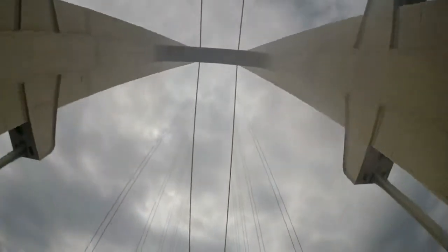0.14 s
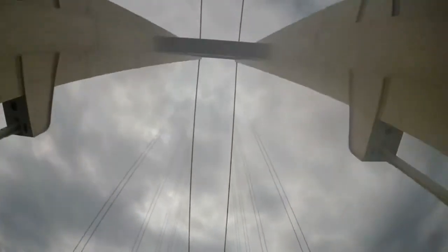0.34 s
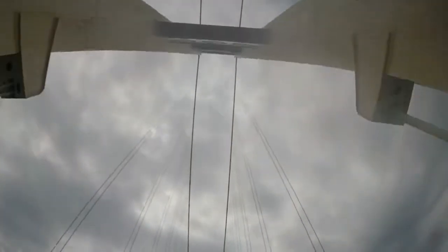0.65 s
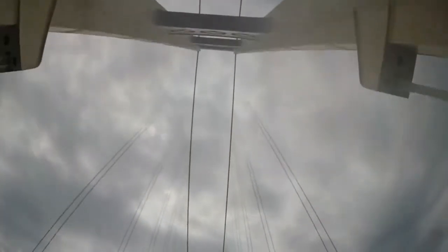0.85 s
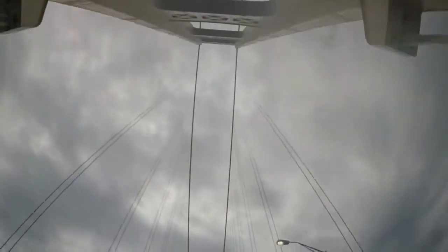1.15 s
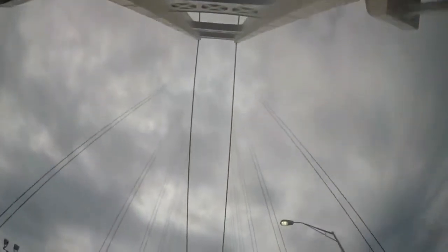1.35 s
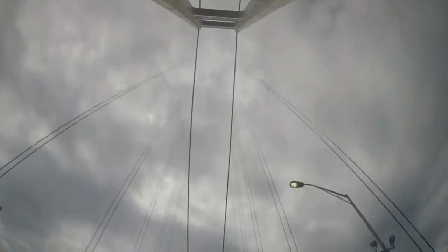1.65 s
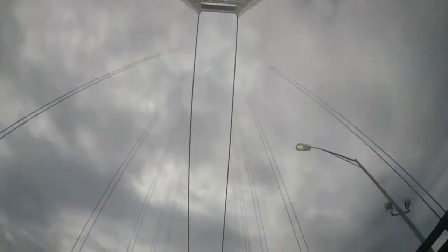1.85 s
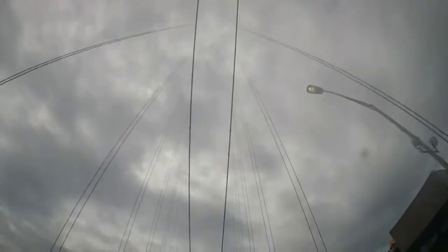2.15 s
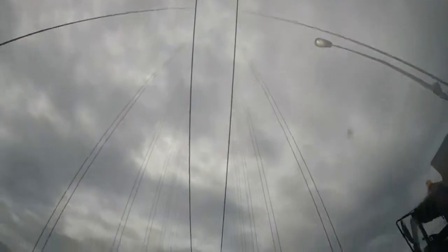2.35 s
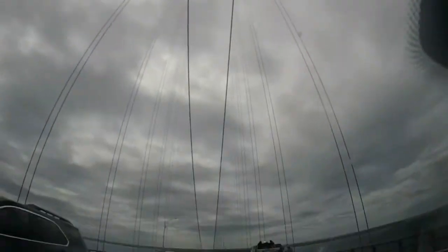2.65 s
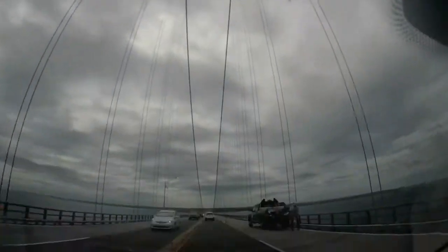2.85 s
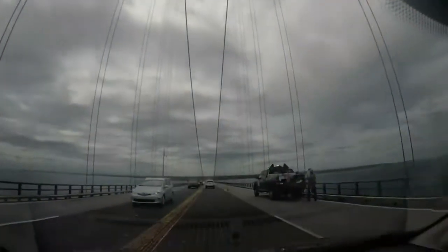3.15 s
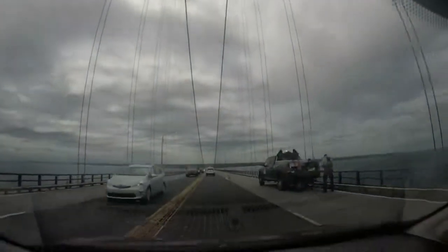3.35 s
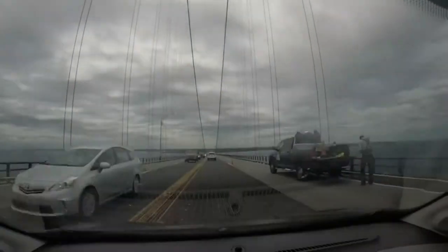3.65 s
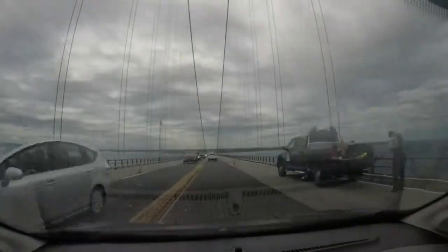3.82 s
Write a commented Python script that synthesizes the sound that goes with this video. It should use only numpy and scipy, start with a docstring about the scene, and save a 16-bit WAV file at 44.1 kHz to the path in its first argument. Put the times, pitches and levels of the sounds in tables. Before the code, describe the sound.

Tyres humming on a steel bridge deck, heard inside a rumbling car, with a few clicks.

```python
"""Tyres hum on the steel grating of a suspension bridge, heard from inside a car gathering speed.
The bars beat on the tread, so the hum climbs in pitch, and the deck drones along more weakly.
All the while the body rumbles, the road roars through the floor and wind hisses at the windows.
A camera is tilted down by hand: its plastic case clicks and its mount rubs."""
import sys
import numpy as np
from scipy import signal
from scipy.fft import rfft, irfft
from scipy.io import wavfile
from scipy.ndimage import uniform_filter1d

SR = 44100
rng = np.random.default_rng(int(sys.argv[2]) if len(sys.argv) > 2 else 0)


def to_wav(sig):
    """Store sig (one row per channel, or 1-D mono) as 16-bit WAV at the path in sys.argv[1].

    Samples outside -1..1 are clipped; the rate is SR.
    """
    pcm = np.clip(np.atleast_2d(sig), -1, 1) * 32767
    pcm = np.round(pcm).astype(np.int16)
    wavfile.write(sys.argv[1], SR, pcm.T)  # frames by channels


N = 175518
TIME = np.arange(N) / SR


def gain_of(db):
    """Turns decibels (dB) into a number to multiply by."""
    return 10 ** (np.asarray(db) / 20)


def evened(x):
    """Scales a signal to an average power of 1."""
    return x / np.sqrt(np.mean(abs(x) ** 2) + 1e-20)


def curve(rows, column=1):
    """Joins a table's points in time with straight lines."""
    rows = np.array(rows)
    return np.interp(TIME, rows[:, 0], rows[:, column])


def add(mix, start_s, sound):
    """Mixes a sound in at its start time."""
    part = mix[max(round(start_s * SR), 0):][:len(sound)]
    part += sound[:len(part)]


def noise(spectrum):
    """Noise with the given balance of low and high frequencies."""
    hz, db = np.transpose(spectrum)
    shape = gain_of(np.interp(np.log(np.fft.rfftfreq(N, 1 / SR) + 1), np.log(hz), db))
    return evened(irfft(rfft(rng.standard_normal(N)) * shape, N))


def wander(rate_hz):
    """A random drift, mostly slower than the given rate."""
    smoothing = 1 + (np.fft.rfftfreq(N, 1 / SR) / rate_hz) ** 2
    return evened(irfft(rfft(rng.standard_normal(N)) / smoothing, N))


def steadied(x, span_s):
    """Takes the slow swells out of a noise."""
    return x / np.sqrt(abs(uniform_filter1d(x ** 2, int(span_s * SR))) + 1e-9)


def patchy(x, depth_db, band_hz=400, swell_s=.06):
    """Lets narrow bands of a noise swell and sink on their own."""
    bands = signal.stft(x, nperseg=1024, noverlap=768)[2]
    bin_hz, frame_s = SR / 1024, 256 / SR
    swells = uniform_filter1d(rng.standard_normal(bands.shape), int(band_hz / bin_hz), axis=0)
    swells = evened(uniform_filter1d(swells, int(swell_s / frame_s), axis=1))
    return evened(signal.istft(bands * gain_of(depth_db * swells), nperseg=1024, noverlap=768)[1][:N])


def tone(hz, unsteady, rate_hz):
    """A tone that follows a pitch curve; unsteady runs from 0 (pure) to 1 (all waver)."""
    waver = unsteady * (wander(rate_hz) + 1j * wander(rate_hz)) / np.sqrt(2)
    wave = np.exp(2j * np.pi * (np.cumsum(hz) / SR + rng.random()))
    return np.sqrt(2) * ((np.sqrt(1 - unsteady ** 2) + waver) * wave).real


def gate(start, end, rise_s=.07, fall_s=.07):
    """Fades in, holds and fades out."""
    return np.clip((TIME - start) / rise_s, 0, 1) * np.clip((end - TIME) / fall_s, 0, 1)


def ring(hz, db, ring_s):
    """One vibration that fades by 60 dB in ring_s seconds."""
    t = np.arange(SR // 10) / SR
    return gain_of(db - 60 * t / ring_s) * np.sin(2 * np.pi * hz * t)


def cabin(x, echo_db, ring_s=.04):
    """Adds dense, quickly dying echoes off the glass and trim."""
    t = np.arange(SR // 10) / SR
    tail = rng.standard_normal(len(t)) * gain_of(-60 * t / ring_s)
    return x + gain_of(echo_db) * signal.fftconvolve(x, tail / np.linalg.norm(tail))[:N]


# How loud the body rumbles. Each row: time in seconds, level in dB.
RUMBLE_LEVELS = [(0, -10.5), (.23, -11), (.29, -22.5), (.45, -17.5), (.56, -21.5), (.66, -12.5), (.78, -18),
                 (.93, -15.5), (1.05, -22.5), (1.32, -25), (1.6, -20), (1.85, -14.5), (2.1, -20.5),
                 (2.5, -26.5), (2.69, -12.5), (2.82, -23), (3.2, -12), (3.45, -18), (3.56, -11.5),
                 (3.7, -21.5), (3.98, -15.5)]
# The rumble's tone colour. Each row: frequency in Hz, relative level in dB.
RUMBLE_COLOUR = [(5, -19), (22, -2.5), (32, -6.5), (42, -10), (55, -17.5), (75, -21.5), (95, -35),
                 (150, -33), (230, -60), (600, -130)]


def body_rumble():
    """Bumps shake the car's body into a deep rumble."""
    return gain_of(curve(RUMBLE_LEVELS)) * steadied(noise(RUMBLE_COLOUR), span_s=.077)


# How loud the road roars. Each row: time in seconds, low roar in dB, upper roar in dB.
ROAR_LEVELS = [(0, -35, -39), (.25, -31, -39.5), (.36, -37.5, -48), (.55, -34, -44.5), (.8, -39.5, -40.5),
               (1.05, -34.5, -45.5), (1.4, -30, -37.5), (1.7, -24, -38.5), (2.1, -26, -32),
               (2.4, -22.5, -32.5), (2.8, -25.5, -34.5), (3.05, -23, -33), (3.35, -28.5, -35),
               (3.65, -36.5, -35.5), (3.98, -28.5, -34.5)]
# The tone colours of the two roars. Each row: frequency in Hz, relative level in dB.
LOW_ROAR_COLOUR = [(40, -14), (72, 2.5), (130, -5.5), (175, -4.5), (220, -16), (330, -15.5), (450, -22),
                   (3000, -100)]
UPPER_ROAR_COLOUR = [(150, -9.5), (330, 1), (430, 1.5), (520, 0.5), (640, 2.5), (800, -6.5), (1000, -6.5),
                     (1300, -6.5), (1550, -11.5), (1800, -16), (2200, -27.5), (3000, -29), (14000, -86)]


def road_roar():
    """The rolling tyres roar through the floor; the upper part flutters slightly."""
    low = gain_of(curve(ROAR_LEVELS)) * steadied(noise(LOW_ROAR_COLOUR), span_s=.4)
    upper_db = curve(ROAR_LEVELS, column=2) + .5 * wander(rate_hz=49)
    upper = evened(cabin(noise(UPPER_ROAR_COLOUR), echo_db=-11))
    return low + gain_of(upper_db) * patchy(upper, depth_db=1)


# How loud the wind hisses. Each row: time in seconds, level in dB.
HISS_LEVELS = [(0, -59), (.28, -62.5), (.36, -69.5), (.55, -60.5), (.85, -55), (1.1, -59.5), (1.7, -54),
               (2.05, -47.5), (2.45, -44), (2.7, -45.5), (3.0, -52), (3.4, -56), (3.98, -79)]
# The hiss's tone colour. Each row: frequency in Hz, relative level in dB.
HISS_COLOUR = [(800, -3.5), (2000, 0.5), (2800, -4.5), (3400, 0), (3900, -2.5), (4300, -4), (5200, -5.5),
               (6400, -4.5), (8500, -10), (11000, -19.5), (13000, -19), (14500, -31.5)]
# The wind's whistle. In order: start and end in seconds, pitch in Hz, level in dB.
GAP_WHISTLE = (.62, 3, 4169, -69.5)


def wind():
    """Air hisses along the windows and for a while whistles faintly in a gap."""
    hiss_db = curve(HISS_LEVELS) + .5 * wander(rate_hz=27)
    hiss = patchy(evened(cabin(noise(HISS_COLOUR), echo_db=-11)), depth_db=2)
    start, end, hz, db = GAP_WHISTLE
    whistle = gain_of(db) * gate(start, end) * tone(np.full(N, hz), unsteady=1, rate_hz=35)
    return gain_of(hiss_db) * hiss + whistle


# The notes the camera case rings at, before each click adjusts them.
# Each row: pitch in Hz, relative level in dB, ring time in seconds.
CASE_NOTES = [(412, -22.5, 0.025), (769, -3, 0.0098), (1326, -3, 0.0056), (1830, -1.5, 0.0067),
              (2476, -0.5, 0.0041), (2200, -33.5, 0.061), (3320, -17.5, 0.012), (4496, -9.5, 0.0059),
              (5400, -12, 0.0051), (6950, -16.5, 0.0018)]
# The clicks. Each row: start in seconds, ring level in dB, brightness in dB per octave, ring time multiplier,
# pitch muted because the blow lands on its still point in Hz, knock pitch in Hz, knock level in dB, tick level
# in dB.
CASE_CLICKS = [(0.151, -10.5, 1, 0.93, 4440, 300, -20, -23.5),
               (0.3033, -4.5, -4.5, 1.4, 2080, 430, -18, -37), (0.41, -33, -2, 1.07, 3200, 490, -59, -70),
               (0.9918, -3.5, 0, 1.9, 574, 294, -17, -27), (1.394, -25.5, -7.5, 1.5, 1900, 490, -49, -47),
               (1.5155, -11, 1, 1.36, 1349, 400, -17, -28), (2.0628, -21, -6, 1, 1500, 450, -29, -61),
               (2.775, -20, 3.5, 3, 4930, 490, -33, -38), (2.9108, -9, 2, 1.3, 1975, 710, -34, -34),
               (3.022, -17.5, 3.5, 0.75, 4900, 483, -41, -67)]


def case_clicks():
    """Each snap ticks, rings the plastic case and knocks the mount; where the blow lands mutes one note."""
    out = np.zeros(N)
    for start, db, brightness, stretch, node_hz, knock_hz, knock_db, tick_db in CASE_CLICKS:
        for k, (hz, note_db, ring_s) in enumerate(CASE_NOTES):
            chance_db, detune = rng.uniform(-1, 1), rng.uniform(-.025, .025)
            node_db = -6 * np.exp(-(np.log2(hz / node_hz) / .35) ** 2)
            level_db = db + note_db + node_db + brightness * np.log2(hz / 1800) + chance_db
            add(out, start, (-1) ** k * ring(hz * (1 + detune), level_db, ring_s * stretch))
        add(out, start, ring(knock_hz, knock_db, ring_s=.016))
        add(out, start, ring(hz=9740, db=tick_db, ring_s=.0018))
    return cabin(out, echo_db=-17)


# The hum rises as the car speeds up. Each row: time in seconds, pitch in Hz.
HUM_PITCH = [(1.0, 91.1), (1.4, 94), (2.65, 96.75), (3.0, 101.1), (3.4, 104.2), (3.98, 107.2)]
# How loud its lowest note is. Each row: time in seconds, level in dB.
HUM_LEVELS = [(0.9, -54), (1.06, -25.5), (1.38, -25), (1.6, -15), (1.85, -16.5), (2.2, -13), (2.42, -9.5),
              (2.62, -9.5), (2.71, -18), (2.92, -17), (3.04, -9.5), (3.25, -16), (3.5, -10), (3.63, -15.5),
              (3.98, -14)]
# Its overtones. Each row: time in seconds, level in dB at twice the pitch, then at three times.
OVERTONE_LEVELS = [(1.0, -56, -60.5), (1.4, -32, -40.5), (1.8, -38.5, -41.5), (2.1, -26, -40),
                   (2.52, -40.5, -26.5), (2.78, -26, -34), (3.05, -41, -31), (3.38, -35.5, -34.5),
                   (3.56, -49, -45.5), (3.98, -45.5, -44.5)]
# Higher overtones follow the one at three times the pitch, up to a ceiling.
# Each row: multiple of the pitch, level in dB relative to that capped level.
HIGH_OVERTONES = [(4, -8.5), (5, -6), (6, -9)]


def tyre_hum(ceiling_db=-36):
    """The bars of the grating beat on the tread: a strong low hum with unsteady overtones."""
    hz, third_db = curve(HUM_PITCH), curve(OVERTONE_LEVELS, column=2)
    lowest = gain_of(curve(HUM_LEVELS)) * tone(hz, unsteady=.2, rate_hz=31)
    second = gain_of(curve(OVERTONE_LEVELS)) * tone(2 * hz, unsteady=.6, rate_hz=4.7)
    third = gain_of(third_db) * tone(3 * hz, unsteady=.25, rate_hz=4)
    high = sum(gain_of(db) * tone(k * hz, unsteady=.9, rate_hz=9) for k, db in HIGH_OVERTONES)
    return lowest + second + third + gain_of(np.minimum(third_db, ceiling_db)) * high


# The deck's drones. Each row: start and end in seconds, first and last pitch in Hz, level in dB.
DECK_DRONES = [(1.235, 2.9, 145, 152, -26.5), (3, 4.2, 158, 175, -34), (1.21, 2.1, 240, 242, -37.5),
               (1.65, 2.45, 303, 299, -37), (2.89, 3.07, 399, 404, -30), (1.93, 2.17, 360, 500, -34.5)]


def deck_drones():
    """The steel deck drones under the wheels: weaker notes that come and go beside the hum."""
    out = np.zeros(N)
    for start, end, first_hz, last_hz, db in DECK_DRONES:
        hz = curve([(start, first_hz), (end, last_hz)])
        out += gain_of(db) * gate(start, end) * tone(hz, unsteady=.5, rate_hz=7)
    return out


# The rubs of the mount. Each row: start in seconds, length in seconds, level in dB.
RUB_STROKES = [(1.508, 0.13, -36), (2.759, 0.17, -35.5), (2.926, 0.27, -41), (3.152, 0.29, -49),
               (3.32, 0.12, -55), (3.403, 0.78, -50)]
# Their tone colour. Each row: frequency in Hz, relative level in dB.
RUB_COLOUR = [(400, -10), (1200, 0), (1850, 2), (2100, -0.5), (2500, 2), (3000, -1.5), (3450, -3.5),
              (4650, -7.5), (5500, -8), (6800, -14.5), (8500, -21.5), (13500, -37), (15000, -47)]


def mount_rubs():
    """Friction in the mount makes a grainy scrape while the camera turns."""
    strokes = sum(gain_of(db) * gate(start, start + length, rise_s=.0083, fall_s=.058)
                  for start, length, db in RUB_STROKES)
    scrape = patchy(noise(RUB_COLOUR), depth_db=3)
    grain = np.exp(.17 * wander(rate_hz=72))
    return strokes * evened(scrape * grain)


def scene():
    """Adds the bridge, car and camera sounds into one channel."""
    driving = tyre_hum() + deck_drones() + body_rumble() + road_roar() + wind()
    return (driving + mount_rubs() + case_clicks())[None]


def record(dry):
    """Fades in quickly, caps the peaks at full scale and cuts the highest treble."""
    faded = dry * np.minimum(TIME / .006, 1)
    treble_cut = signal.firwin(255, 14500, window=("kaiser", 9), fs=SR)
    return signal.oaconvolve(np.clip(faded, -1, 1), treble_cut[None], "same")


dry = scene()
out = record(dry)
to_wav(out)
```